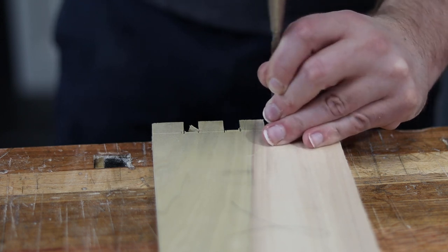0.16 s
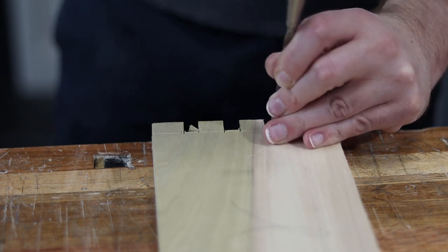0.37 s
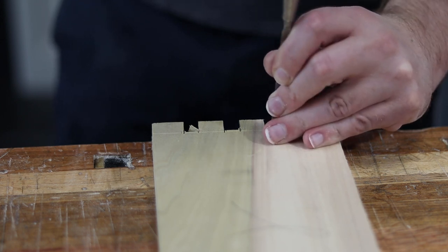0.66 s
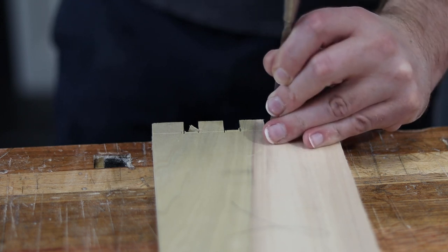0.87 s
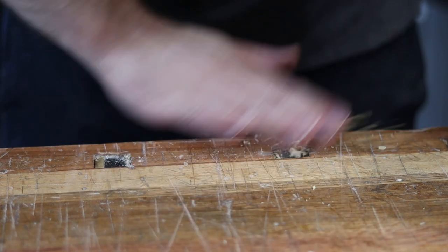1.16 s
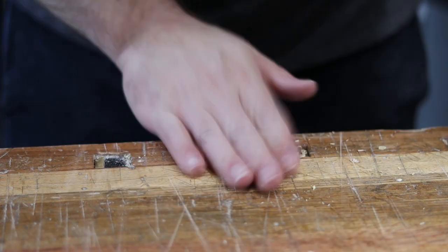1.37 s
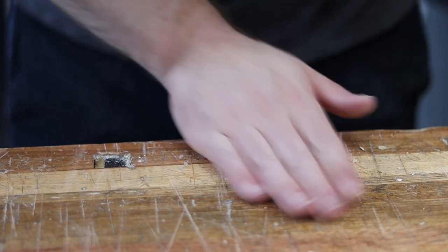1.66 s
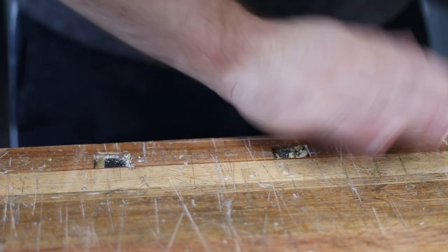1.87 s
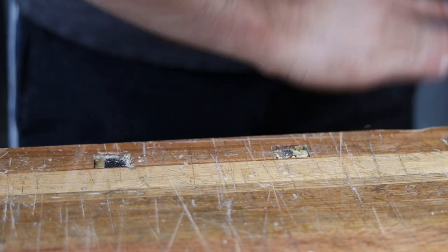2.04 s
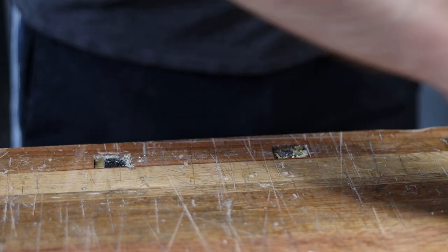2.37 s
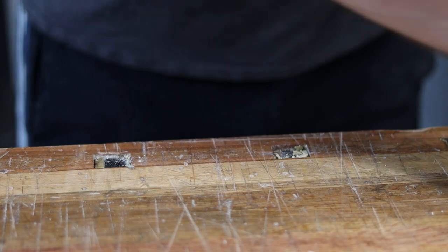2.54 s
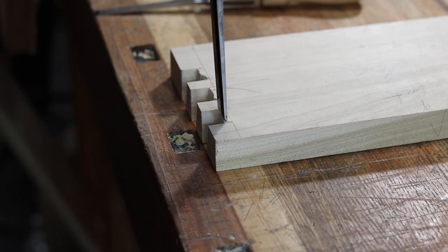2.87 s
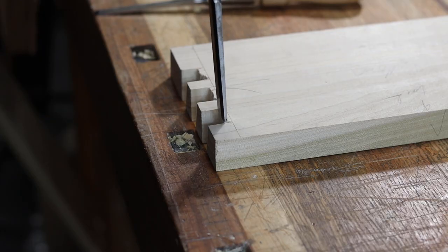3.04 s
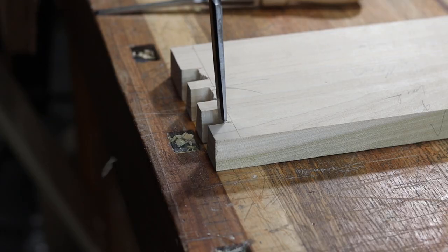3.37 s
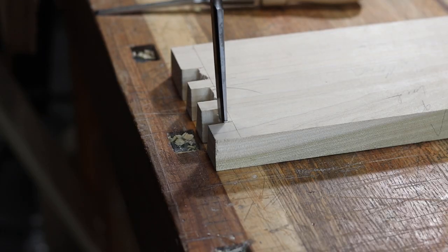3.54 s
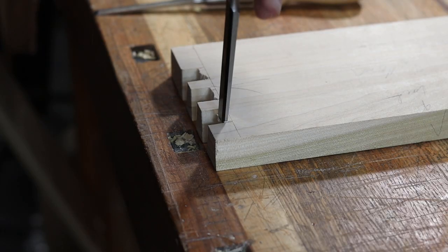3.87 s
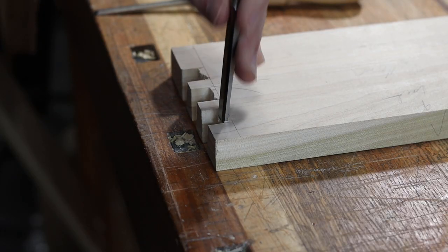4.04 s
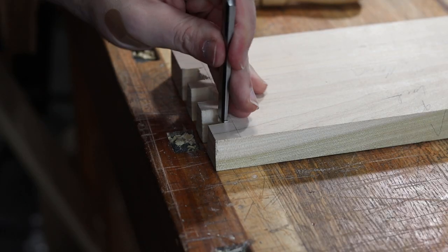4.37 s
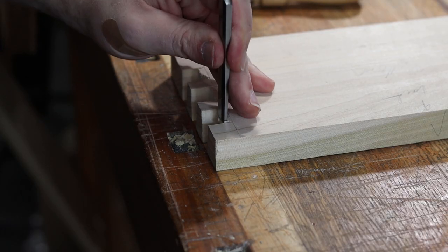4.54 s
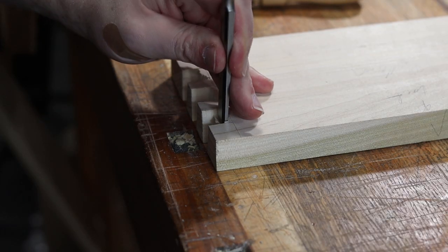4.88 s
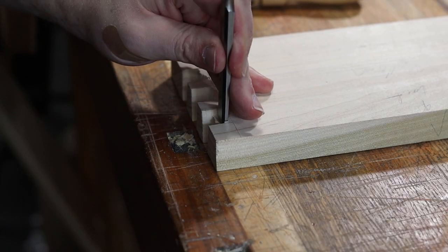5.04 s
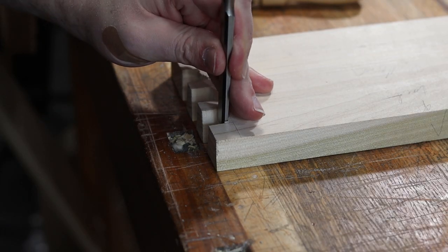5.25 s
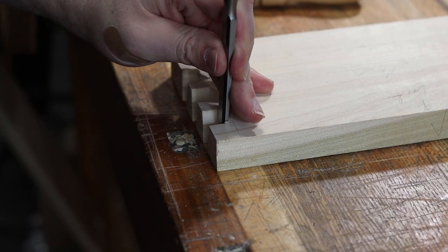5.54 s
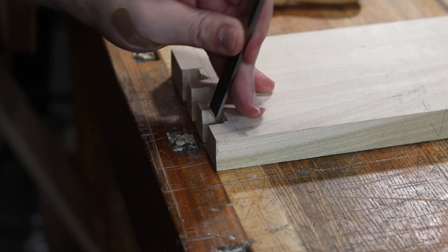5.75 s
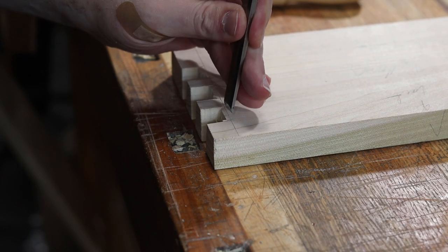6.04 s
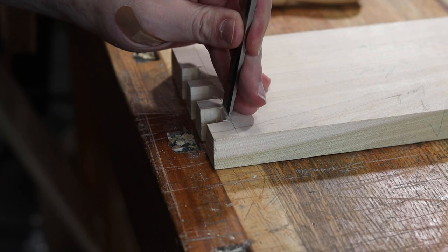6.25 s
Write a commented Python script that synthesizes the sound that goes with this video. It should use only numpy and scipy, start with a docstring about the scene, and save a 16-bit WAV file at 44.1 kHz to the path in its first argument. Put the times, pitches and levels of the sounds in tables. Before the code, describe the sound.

A small, live workshop with very quiet low air, heard close with slightly overloaded peaks. The tail of an earlier blow is fading as a mallet hits a chisel at 0.1 s, a woody, board-heavy knock ringing about half a second. From 1.2 to 2.1 s a hand brushes the bench in four short swipes about 0.3 s apart, each a dry hiss with a soft low thump, chips rasping and skittering between. Around 2.35 s a sleeve rustles over low rumble with a faint high swish; at 2.77 s the chisel is set down with a light knock. Hard, bright cracks with bench thud land at 3.0, 3.3 and 3.6 s, steel chattering after each. A long, faint sweep passes at 3.9-4.3 s, a tiny scuff at 4.55 s. Four more blows come at 4.7 (weaker), 5.0, 5.3 and 5.55 s, the last with a sharp steel tick, then the room decay.

```python
"""The fading tail of an earlier blow, then one mallet blow on a chisel in a board on a heavy bench, in a
small live workshop. A hand sweeps chips off the bench, a sleeve rustles over a low rumble and the chisel
is set down on the wood. Runs of three and four blows follow, one long faint sweep between them, over still air.
Blow: shaped noise echoes, damped chisel modes, slower bench modes, lingering tones; steel chatters after some.
Hand, chips and cloth are shaped noise or random grains; an overloading input stage flattens the peaks."""
import sys
import numpy as np
from scipy import signal
from scipy.fft import rfft, irfft
from scipy.io import wavfile
from scipy.ndimage import uniform_filter1d

SR = 44100
rng = np.random.default_rng(int(sys.argv[2]) if len(sys.argv) > 2 else 0)


def dump(signal):
    """Clip the signal to [-1, 1] and save it as 16-bit WAV at the path in sys.argv[1]."""
    limited = np.clip(np.atleast_2d(signal).T, -1, 1)
    pcm = np.round(limited * 32767).astype(np.int16)
    wavfile.write(sys.argv[1], SR, pcm)


N = 282681
SIZE = 2 ** 15   # samples per event
AGE_S = np.arange(SIZE) / SR   # time since an event began

# Colours are relative spectral densities; the noise they shape is scaled to rms 1.
# still air of the shop: (f/Hz, density/dB per Hz)
AIR_COLOUR = [(12, -58.5), (20, -27), (123, 1), (146, -10), (193, -6), (399, -15), (825, -16), (949, -24),
              (1120, -21), (1660, -29), (4300, -39.5), (16000, -50.5)]
AIR_DB = -62.5
# workshop decay: (f/Hz, t60/s)
ROOM_T60 = [(60, 0.72), (160, 0.36), (420, 0.58), (1100, 0.58), (2900, 0.45), (5000, 0.6), (8000, 0.43),
            (14000, 0.43)]
# reverberant tail behind hand and chips: (f/Hz, density/dB per Hz)
TAIL_COLOUR = [(60, -15), (3000, 7), (8000, 4), (16000, 6.5)]

# arm reaching across the bench: (t of peak/s, rumble level/dB, rustle level/dB)
REACHES = [(2.346, -55.5, -63), (2.59, -64, -77), (2.72, -62.5, -78)]
REACH_RISE_DB_PER_S, REACH_FALL_DB_PER_S = 134, 75
# low rumble of a reach: (f/Hz, density/dB per Hz)
RUMBLE_COLOUR = [(70, -26.5), (120, 13.5), (180, -8), (300, -3)]
# rustling cloth, also the opening tail: (f/Hz, density/dB per Hz)
SLEEVE_COLOUR = [(400, -4.5), (900, -4.5), (1700, 0), (3000, -6.5), (5000, -18.5), (9000, -29.5),
                 (15000, -32.5)]
OPENING_TAIL_DB = -56

# high swish as the hand leaves the bench: (t/s, level/dB, 1/e decay/s)
SWISH = (2.359, -69.5, 0.11)
# its spectrum: (f/Hz, density/dB per Hz)
SWISH_COLOUR = [(3000, -9), (5500, -7), (7000, 3), (8700, -1), (10000, -19), (14000, -18)]
# chisel set on the board: (t/s, level/dB)
SET_DOWN = (2.765, -46.5)
# its light knock: (f/Hz, density/dB per Hz)
SET_DOWN_COLOUR = [(120, -17.5), (280, 3.5), (450, -3), (750, -7.5), (1050, -5.5), (1500, -16.5),
                   (3500, -22.5), (6000, -32.5), (14000, -57.5)]

# hand sliding over wood: (t/s, length/s, hiss level/dB, thump level/dB, dragged chips level/dB)
SWEEPS = [(1.201, 0.068, -55.5, -41, -73), (1.497, 0.054, -56, -38.5, -62),
          (1.783, 0.076, -54.5, -47.5, -53.5), (2.041, 0.078, -56.5, -38, -64),
          (3.855, 0.44, -73.5, -60, -90)]
# skin on wood: (f/Hz, density/dB per Hz)
PALM_COLOUR = [(300, 8.5), (1300, -2), (2600, 4.5), (4000, 2), (6500, 2), (10000, -3.5), (16000, -7.5)]
# chips catching twice on the bench: (t/s, first level/dB, centre f/Hz, second re first level/dB)
SCUFFS = [(1.276, -62, 2800, -13), (1.407, -39.5, 1870, -2), (1.468, -45, 2100, -0.5),
          (1.765, -51.5, 1750, 12.5), (2.045, -54, 2340, -6), (2.133, -44, 1550, -4.5),
          (4.547, -71, 3180, -6.5)]
# chip rasp: (f/centre f, density/dB per Hz)
SCUFF_COLOUR = [(.4, -10), (.62, 7), (.9, 10), (1.25, 5.5), (1.8, -8.5), (3.8, -13), (5.999, -28)]
CATCH_GAP_S, CATCH_DECAY_S = 0.0102, 0.0059   # decay to 1/e

# chisel jumping in the cut: (t/s, steel ring level/dB, tick level/dB)
CHATTER = [(3.071, -44, -31.5), (3.106, -53.5, -49), (3.370, -39.5, -33), (3.386, -46, -40),
           (3.690, -47, -44), (4.722, -49, -33), (4.74, -52.5, -40), (5.588, -36.5, -25)]
# two narrow ringing bands of steel: (f/Hz, density/dB per Hz)
STEEL_COLOUR = [(6000, -24.5), (6220, -4.5), (6340, 1.5), (6480, -4), (6750, -23.5), (8050, -31.5),
                (8360, -8), (8650, -30.5)]

# mallet blows, levels ahead of the trims in mallet(): (t/s, wood level/dB, handle level/dB,
# blade level/dB, steel ring level/dB, chisel pitch factor, board's share of the wood sound/0-1)
BLOWS = [(0.088, -33.5, -34.5, -49.5, -61, 1.03, 0.73), (3.0145, -25, -31.5, -36.5, -48.5, 0.99, 0.11),
         (3.329, -23.5, -32.5, -37, -40.5, 1.018, 0.28), (3.6214, -22.5, -30.5, -35, -43, 1.02, 0.27),
         (4.6862, -28, -38, -43, -53.5, 0.94, 0.13), (4.9877, -24, -30.5, -35, -41.5, 1.0, 0.16),
         (5.2823, -25.5, -30.5, -33, -45.5, 1.02, 0.22), (5.563, -24, -33.5, -37, -42.5, 1.0, 0.25)]
# bench radiation: (f/Hz, density/dB per Hz)
BENCH_COLOUR = [(30, -27), (70, -14.5), (130, -4.5), (220, 1), (340, 3.5), (600, -1.5), (900, -1.5),
                (1250, -2.5), (1600, -11), (2000, -12.5), (2600, -30.5)]
# board radiation: (f/Hz, density/dB per Hz)
BOARD_COLOUR = [(60, -20), (130, -11), (240, -6.5), (340, -0.5), (480, -1), (630, 5), (710, 3), (830, -6.5),
                (1250, 4), (1650, 2.5), (2100, -2.5), (3150, 1.5), (4100, -9), (6000, -17.5)]
# handle radiation ahead of the pitch factor: (f/Hz, density/dB per Hz)
HANDLE_COLOUR = [(1500, -20.5), (2000, -4), (2300, -3), (2500, 2), (2720, 0), (3020, -8.5), (3300, -6.5),
                 (3650, -16.5), (4200, -33)]
# blade radiation ahead of the pitch factor: (f/Hz, density/dB per Hz)
BLADE_COLOUR = [(3200, -23), (3800, -3), (4250, 1.5), (4550, 2.5), (5000, -2.5), (5330, -2.5),
                (5750, -11.5), (6500, -39.5)]
# cutting edge ahead of the pitch factor, and chatter ticks as is: (f/Hz, density/dB per Hz)
EDGE_COLOUR = [(5000, -13), (5800, -2), (6600, 2.5), (7050, 2), (7700, -8.5), (8900, -8), (9600, -7),
               (12500, -16), (16000, -21.5)]
# chisel modes ahead of pitch factor and board share: (f/Hz, relative level/dB, t60/s)
CHISEL_MODES = [(1254, -9.5, 0.021), (2252, 3.5, 0.012), (2709, -0.5, 0.019), (3290, -3, .015),
                (4556, -4.5, 0.013), (6420, -18, 0.022), (9470, -15, 0.015)]
# bench-top heave ahead of board dulling: (f/Hz, relative level/dB, t60/s)
HEAVE_MODES = [(80, 0, 0.13), (113.7, -1.5, .13), (141.8, -2.5, 0.3), (203.5, 0, 0.17), (259.5, 4.5, .13),
               (352, 1, 0.17)]
# board's brief slap on the bench: (f/Hz, relative level/dB, t60/s)
BOARD_SLAP_MODES = [(340, -9, 0.026), (1730, 0.5, 0.029)]
BOARD_SLAP_DB = -3   # ahead of the squared board share
# board's own tones: (f/Hz, relative level/dB, t60/s)
BOARD_TONES = [(614.5, 0.5, 0.18), (665, -2.5, 0.36), (2750, -0.5, .36), (3000, 0, .33), (3180, -0.5, .33)]
# tones lingering in wood, steel and room: (f/Hz, level re driving part/dB)
LINGER_TONES = [(138, -7), (200, -9), (301, -1.2), (371, -3.5), (450, 0), (514, -4.5), (619, -11),
                (674, -10.5), (754, -7), (856, -5.5), (1000, -5.5), (1042, -8), (1120, -6), (1279, -7.5),
                (1314, -6), (2112, -3), (2234, -7), (2307, -8.5), (2552, -6.5), (2646, -1.5), (2708, 4),
                (2825, -6), (4276, -1.1), (4604, 2), (5297, -8), (6302, 1.5), (8390, -12)]

OVERLOAD_AMPLITUDE = 0.14   # where the input stage flattens
BASS_HOLD_BACK = 0.21   # share of bass held back ahead of overload
LIFT_HZ, LOW_CUT_HZ, CUTOFF_HZ = 1190, 25, 15950


def from_db(db):
    """Decibels to gain."""
    return 10 ** (np.asarray(db) / 20)


def rms_one(x):
    """Scale to unit power."""
    return x / np.sqrt(np.mean(x ** 2) + 1e-20)


def at_hz(points, hz):
    """Read a table on a log-frequency axis."""
    f, value = np.transpose(points)
    return np.interp(np.log(hz + 1e-3), np.log(f), value)


def add(out, t_s, sound):
    """Mix a sound in at a time."""
    i = max(round(t_s * SR), 0)
    out[i:i + len(sound)] += sound[:N - i]


def coloured(x, colour):
    """Shape a spectrum, with skirts beyond the table ends; rms 1."""
    hz = np.fft.rfftfreq(len(x), 1 / SR) + 1e-3
    low_skirt = 1 / (1 + (colour[0][0] / hz) ** 4)
    high_skirt = 1 / (1 + (hz / colour[-1][0]) ** 8)
    gain = from_db(at_hz(colour, hz)) * low_skirt * high_skirt
    return rms_one(irfft(rfft(x) * gain, len(x)))


def noise(colour, size=SIZE):
    """Smooth noise of a given spectrum."""
    return coloured(rng.standard_normal(size), colour)


def grains(per_s, spread_db):
    """Tiny slips of random sign at random moments; sizes uneven by the spread."""
    size_db = spread_db * np.minimum(rng.exponential(1, SIZE), 3)
    slips = from_db(size_db) * rng.choice([-1, 1], SIZE)
    return slips * (rng.random(SIZE) < per_s / SR)


def swell(rise_s):
    """A smooth build-up from silence."""
    return 1 - np.exp(-(AGE_S / rise_s) ** 2)


def reflections():
    """Dense echoes that beat in clumps about 30 ms long and 200 Hz wide."""
    z = signal.stft(rng.standard_normal(SIZE), nperseg=1024)[2]
    z = z / np.sqrt(uniform_filter1d(abs(z) ** 2, size=15, axis=0))   # even out power over frequency
    clumps = uniform_filter1d(rng.standard_normal(z.shape), size=4, axis=0)
    clumps = rms_one(uniform_filter1d(clumps, size=3, axis=1))
    return signal.istft(z * from_db(1.8 * clumps), nperseg=1024)[1][:SIZE]


def die_away(x):
    """Each octave fades at the pace of the workshop."""
    octave = np.log2(np.fft.rfftfreq(SIZE, 1 / SR) + 1)
    spectrum, out = rfft(x), 0
    centres = np.arange(6, 15)   # log2 of f/Hz
    for k in centres:
        weight = np.interp(octave, centres, 1. * (centres == k))
        band = irfft(spectrum * weight, SIZE)
        out = out + band * from_db(-60 * AGE_S / at_hz(ROOM_T60, 2. ** k))
    return out


def workshop(x, wet_db):
    """A sound plus its room tail: convolution with decaying shaped noise."""
    tail = die_away(noise(TAIL_COLOUR)) * swell(rise_s=0.0064)
    tail = tail / np.linalg.norm(tail)
    return x + from_db(wet_db) * signal.fftconvolve(x, tail)[:N]


def ring(modes, scatter_db, detune):
    """Decaying modes; level and relative pitch scatter anew at every touch."""
    out = 0
    for k, (hz, db, t60_s) in enumerate(modes):
        tone = np.sin(2 * np.pi * hz * (1 + detune * rng.standard_normal()) * AGE_S)
        level_db = db + scatter_db * rng.standard_normal() - 60 * AGE_S / t60_s
        out = out + (-1) ** k * tone * from_db(level_db)
    return out


def rasp(centre_hz):
    """A chip skidding on wood: shaped grains, rms 1."""
    colour = [(centre_hz * k, db) for k, db in SCUFF_COLOUR]
    return coloured(grains(per_s=3500, spread_db=0), colour)


def still_air():
    """Steady shaped noise, strongest in the bass."""
    return from_db(AIR_DB) * noise(AIR_COLOUR, size=N)


def sleeve():
    """Each reach swells and fades exponentially: low rumble under the rustle of cloth."""
    out, t_s = np.zeros(N), np.arange(N) / SR
    rumble, rustle = noise(RUMBLE_COLOUR, size=N), noise(SLEEVE_COLOUR, size=N)
    for peak_s, rumble_db, rustle_db in REACHES:
        rise_db = REACH_RISE_DB_PER_S * (t_s - peak_s)
        fall_db = REACH_FALL_DB_PER_S * (peak_s - t_s)
        motion = from_db(np.minimum(rise_db, fall_db))
        out += motion * (from_db(rumble_db) * rumble + from_db(rustle_db) * rustle)
    return out


def handling():
    """Shaped noise: fading opening tail of an earlier blow, swish of the leaving hand, knock of the placed chisel."""
    out = np.zeros(N)
    add(out, 0, from_db(OPENING_TAIL_DB) * die_away(noise(SLEEVE_COLOUR)))
    t_s, db, decay_s = SWISH
    add(out, t_s, from_db(db) * noise(SWISH_COLOUR) * np.exp(-AGE_S / decay_s))
    t_s, db = SET_DOWN
    knock = die_away(noise(SET_DOWN_COLOUR)) * swell(rise_s=0.0011)
    add(out, t_s, from_db(db) * knock)
    return out


def palm(thump_hz=88, thump_t60_s=0.096, chips_hz=1840, skid_s=0.088):
    """The hand lands as a damped low mode, hisses across the grain and sends chips skidding."""
    out = np.zeros(N)
    thump = np.sin(2 * np.pi * thump_hz * AGE_S) * from_db(-60 * AGE_S / thump_t60_s)
    thump = thump * swell(rise_s=0.0053)
    skid = np.exp(-AGE_S / skid_s) * swell(rise_s=0.0067)
    for t_s, length_s, hiss_db, thump_db, chips_db in SWEEPS:
        stroke = np.sqrt(np.sin(np.pi * np.minimum(AGE_S / length_s, 1)).clip(0))
        friction = coloured(grains(per_s=6400, spread_db=3.0), PALM_COLOUR)
        hiss = from_db(hiss_db) * stroke * friction
        chips = from_db(chips_db) * rasp(chips_hz) * skid
        add(out, t_s, hiss + from_db(thump_db) * thump + chips)
    return out


def scuffs():
    """Short double rasps as a chip catches, skips and catches again."""
    out = np.zeros(N)
    catch = np.exp(-AGE_S / CATCH_DECAY_S) * swell(rise_s=0.00055)
    for t_s, db, centre_hz, second_db in SCUFFS:
        add(out, t_s, from_db(db) * rasp(centre_hz) * catch)
        add(out, t_s + CATCH_GAP_S, from_db(db + second_db) * rasp(centre_hz) * catch)
    return out


def chatter(tick_decay_s=0.0043):
    """Steel touching again: a noise tick, then two high bands ringing in the room."""
    out = np.zeros(N)
    for t_s, ring_db, tick_db in CHATTER:
        tick = from_db(tick_db) * noise(EDGE_COLOUR) * np.exp(-AGE_S / tick_decay_s)
        steel = from_db(ring_db) * die_away(noise(STEEL_COLOUR)) * swell(rise_s=0.001)
        add(out, t_s, tick + steel)
    return out


def blow_echoes(wood_db, handle_db, blade_db, edge_db, steel_db, pitch, share):
    """Timber, tool and steel colour the same echoes, which fade with the room."""
    echoes = reflections()
    bench, board = coloured(echoes, BENCH_COLOUR), coloured(echoes, BOARD_COLOUR)
    timber = rms_one((1 - share) * bench + share * board)
    knock = from_db(wood_db) * timber * swell(rise_s=0.0018)
    tool = from_db(steel_db) * coloured(echoes, STEEL_COLOUR)
    for colour, db in [(HANDLE_COLOUR, handle_db), (BLADE_COLOUR, blade_db), (EDGE_COLOUR, edge_db)]:
        pitched = [(hz * pitch, density_db) for hz, density_db in colour]
        tool = tool + from_db(db) * coloured(echoes, pitched)
    return die_away(knock + tool * swell(rise_s=0.0016))


def lingering(wood_db, handle_db, blade_db, steel_db, share, linger_db=-4, linger_t60_s=0.5, board_db=-3):
    """Tones left by a blow, each driven by the part sounding in its range; the board adds its own."""
    drive = [(1400, wood_db), (2000, handle_db), (3400, handle_db),
             (4000, blade_db), (5400, blade_db), (6200, steel_db)]   # (f/Hz, level/dB)
    modes = [(hz, db + at_hz(drive, hz), linger_t60_s) for hz, db in LINGER_TONES]
    tones = ring(modes, scatter_db=2.5, detune=0.0007) * swell(rise_s=0.01)
    board = ring(BOARD_TONES, scatter_db=3.5, detune=0.00092) * swell(rise_s=0.0044)
    return from_db(linger_db) * (1 - share) * tones + share * from_db(wood_db + board_db) * board


def mallet(crack_db=31, heave_db=0.45, wood_trim_db=3, handle_trim_db=3.5, blade_trim_db=5.5,
           edge_trim_db=-12, steel_trim_db=-2, board_ring=0.35, board_dull_db_per_octave=7):
    """Each blow: cracking chisel, heaving bench, slapping board, echoes and lingering tones."""
    out = np.zeros(N)
    for t_s, wood_db, handle_db, blade_db, steel_db, pitch, share in BLOWS:
        steel_db = steel_db + steel_trim_db
        # the cutting edge lies between tool and wood and follows their mean level
        edge_db = (wood_db + handle_db) / 2 + edge_trim_db
        echoes = blow_echoes(wood_db + wood_trim_db, handle_db + handle_trim_db,
                             blade_db + blade_trim_db, edge_db, steel_db, pitch, share)
        # a blow that stays in the board damps the chisel less and stirs only the lowest bench modes
        chisel = [(hz * pitch, db, t60_s * (1 + board_ring * share)) for hz, db, t60_s in CHISEL_MODES]
        dull_db = board_dull_db_per_octave * share
        bench = [(hz, db - dull_db * np.log2(hz / HEAVE_MODES[0][0]), t60_s)
                 for hz, db, t60_s in HEAVE_MODES]
        crack = from_db(handle_db + crack_db) * ring(chisel, scatter_db=4.0, detune=0.02)
        slap = share ** 2 * from_db(BOARD_SLAP_DB) * ring(BOARD_SLAP_MODES, scatter_db=2.0, detune=0.022)
        heave = ring(bench, scatter_db=4.0, detune=0.0061) * swell(rise_s=0.012)
        heave = from_db(wood_db + heave_db) * heave
        tones = lingering(wood_db, handle_db, blade_db, steel_db, share)
        add(out, t_s, echoes + crack + slap + heave + tones)
    return out


def scene():
    """Work at the bench over the still air of the shop."""
    brushing = workshop(palm(), wet_db=-10) + workshop(scuffs(), wet_db=-1.5)
    mix = still_air() + sleeve() + handling() + brushing + chatter() + mallet()
    return mix[None]


def record(dry):
    """The input stage favours treble, so cracks flatten before thumps; its coupling tilts the flat tops."""
    pole = np.exp(-2 * np.pi * LIFT_HZ / SR)
    b, a = [1 - BASS_HOLD_BACK * (1 - pole), -pole], [1, -pole]
    driven = signal.lfilter(b, a, dry)
    flattened = driven / (1 + (driven / OVERLOAD_AMPLITUDE) ** 8) ** (1 / 8)
    restored = signal.lfilter(a, b, flattened)   # inverse of the lift
    low_cut = signal.butter(1, LOW_CUT_HZ, "high", fs=SR, output="sos")
    high_cut = signal.butter(32, CUTOFF_HZ, fs=SR, output="sos")
    return signal.sosfilt(high_cut, signal.sosfilt(low_cut, restored))


dry = scene()
out = record(dry)
dump(out)
```